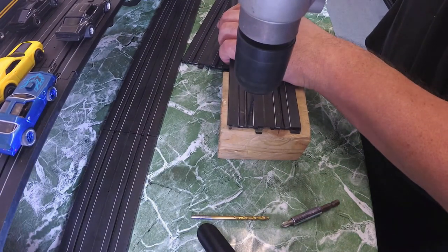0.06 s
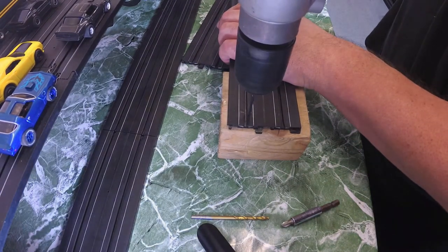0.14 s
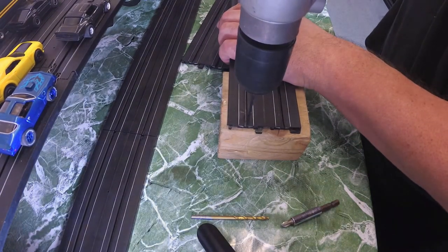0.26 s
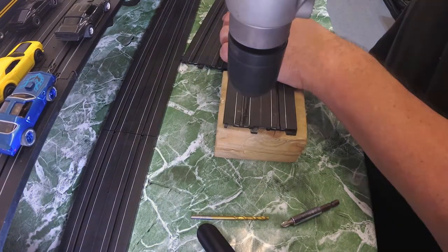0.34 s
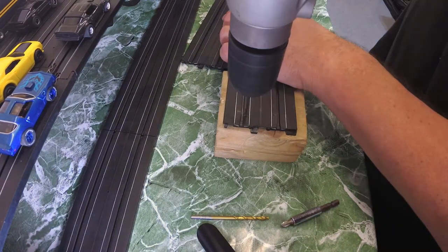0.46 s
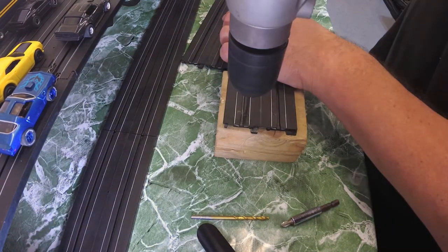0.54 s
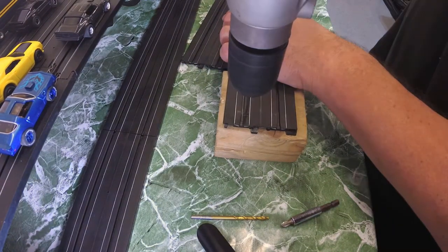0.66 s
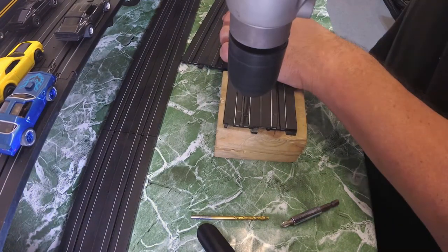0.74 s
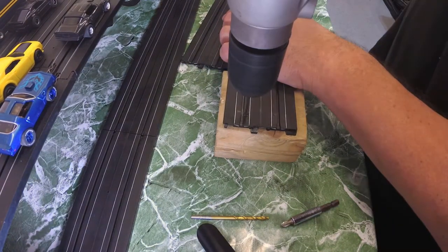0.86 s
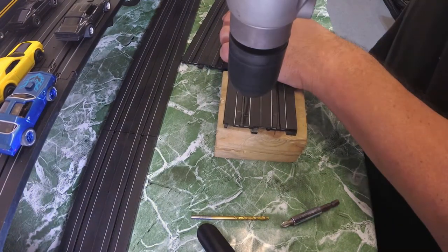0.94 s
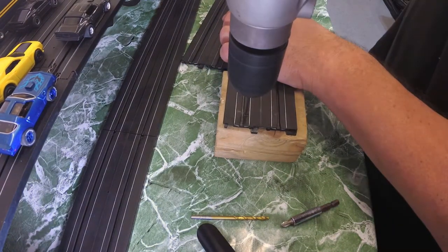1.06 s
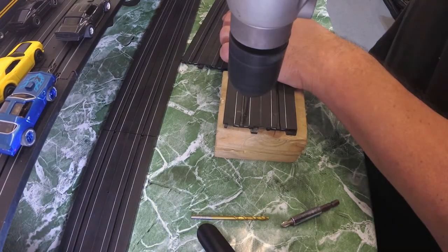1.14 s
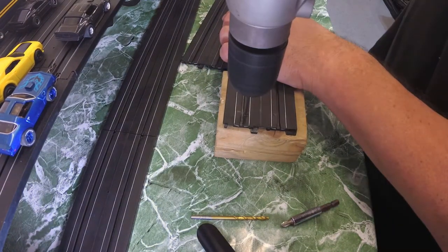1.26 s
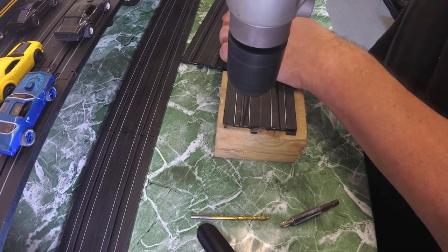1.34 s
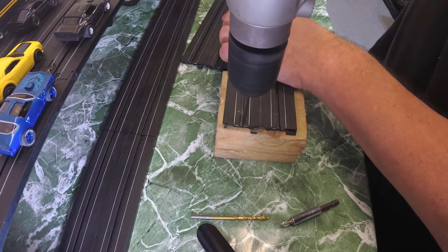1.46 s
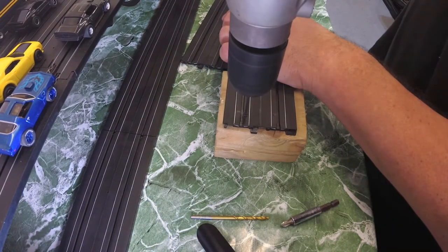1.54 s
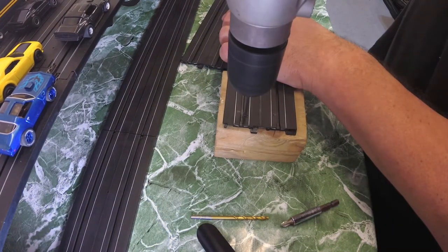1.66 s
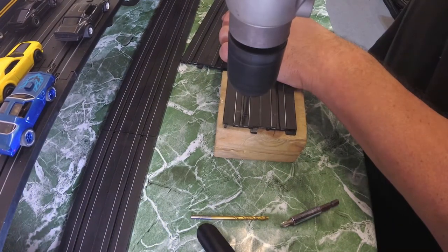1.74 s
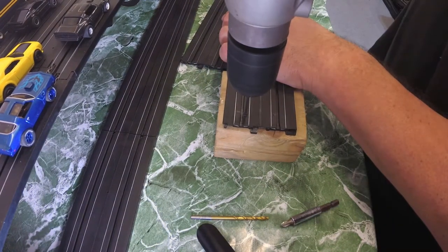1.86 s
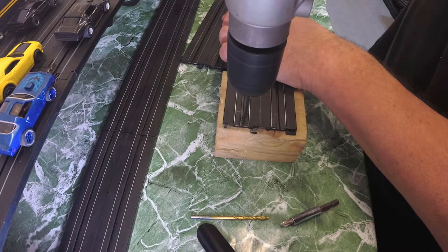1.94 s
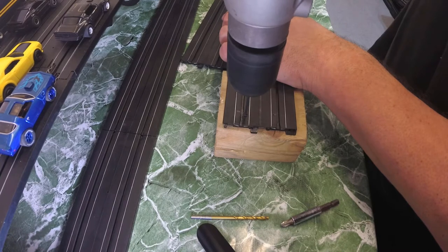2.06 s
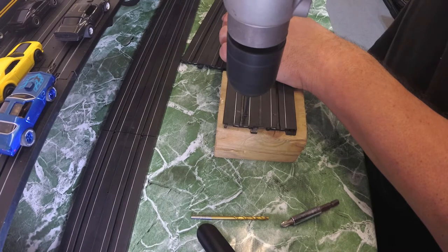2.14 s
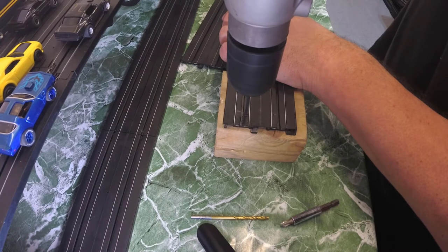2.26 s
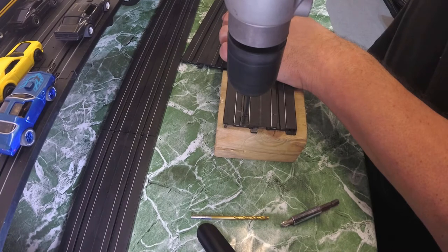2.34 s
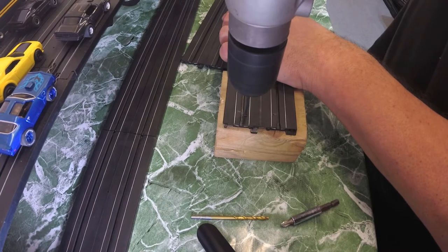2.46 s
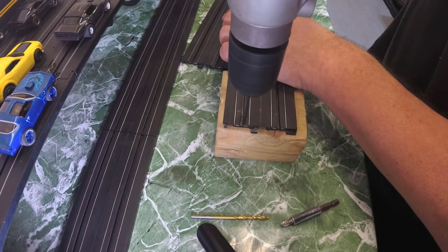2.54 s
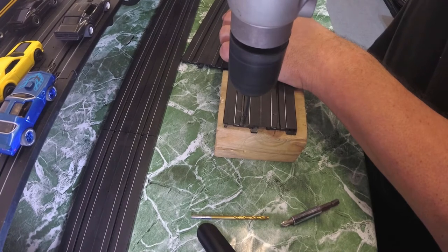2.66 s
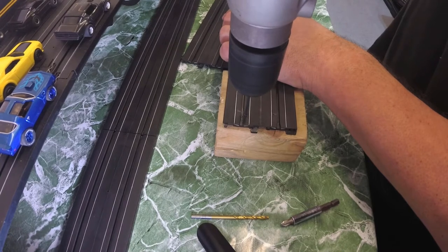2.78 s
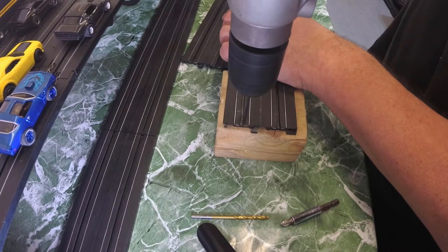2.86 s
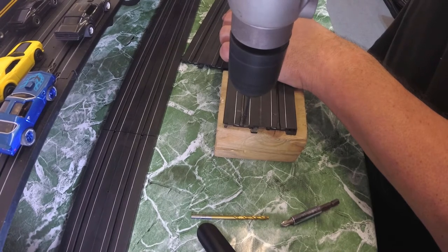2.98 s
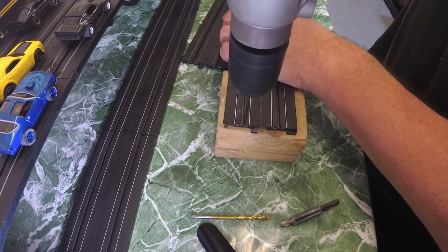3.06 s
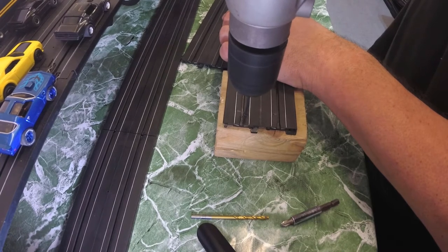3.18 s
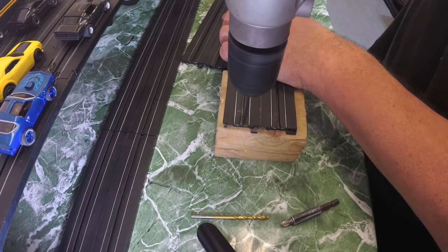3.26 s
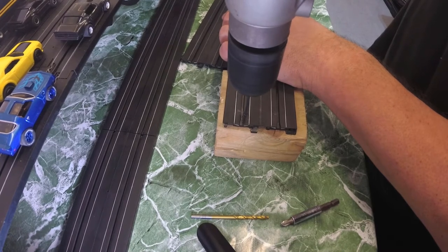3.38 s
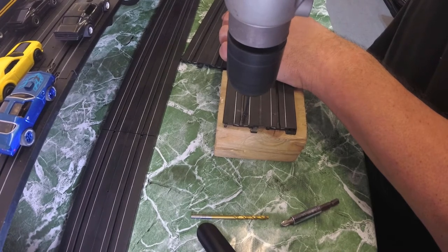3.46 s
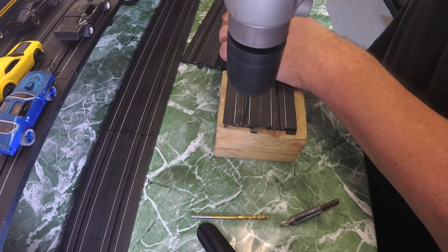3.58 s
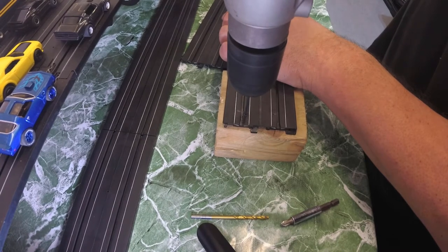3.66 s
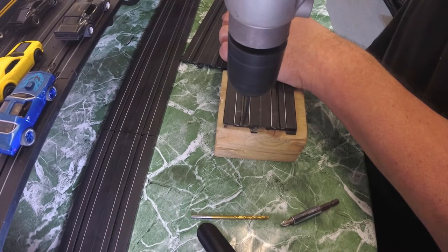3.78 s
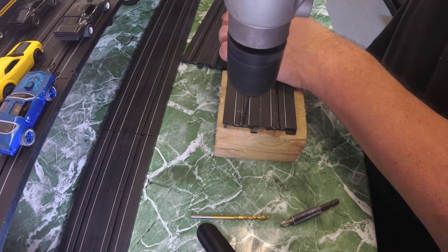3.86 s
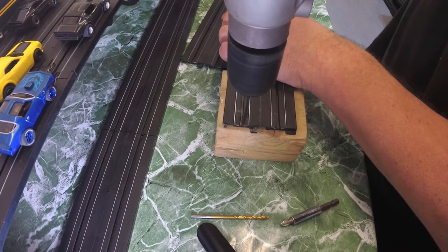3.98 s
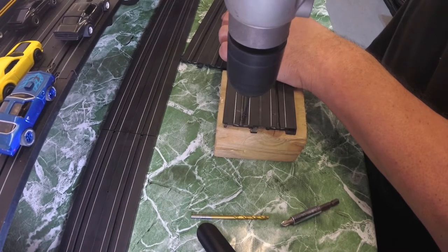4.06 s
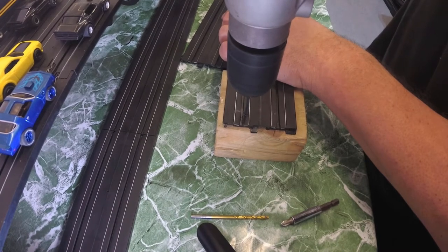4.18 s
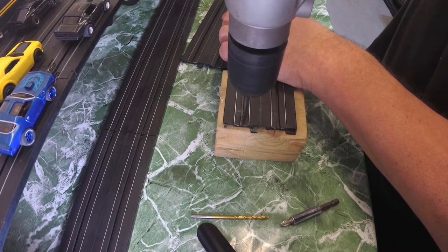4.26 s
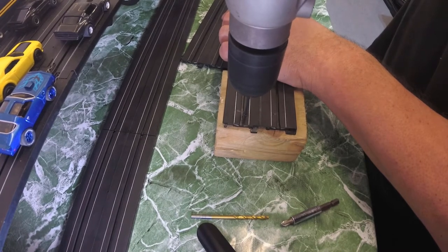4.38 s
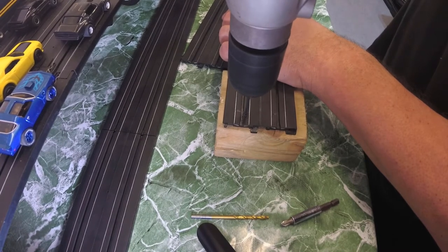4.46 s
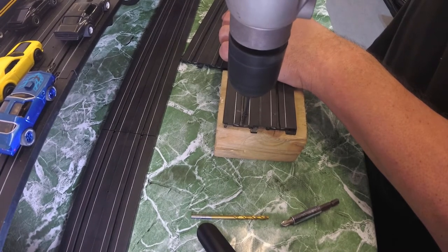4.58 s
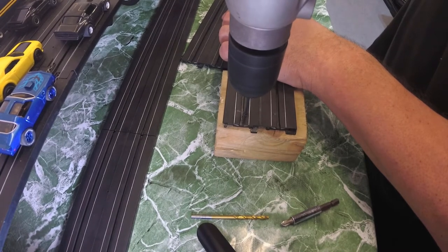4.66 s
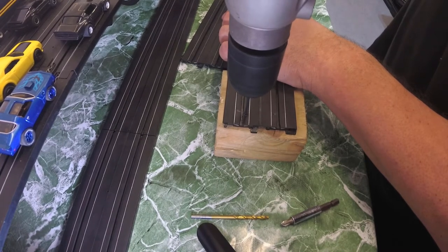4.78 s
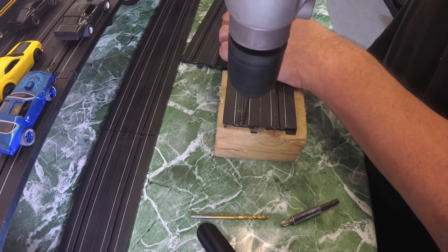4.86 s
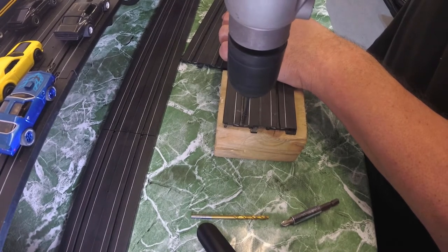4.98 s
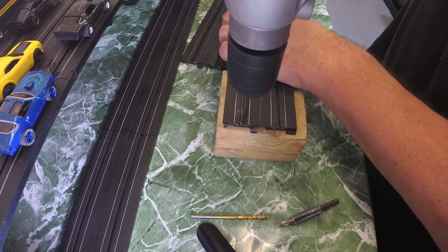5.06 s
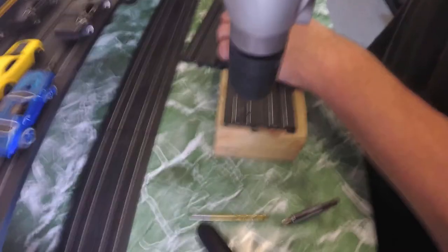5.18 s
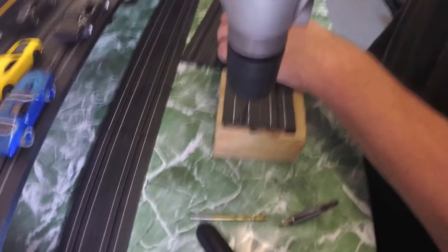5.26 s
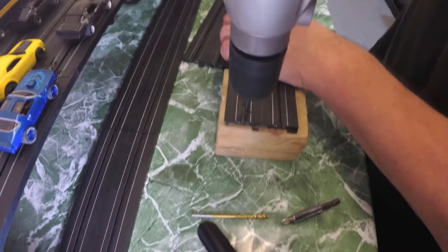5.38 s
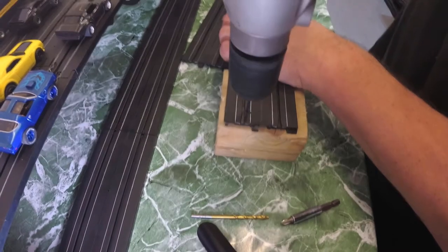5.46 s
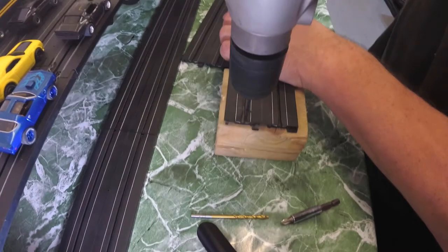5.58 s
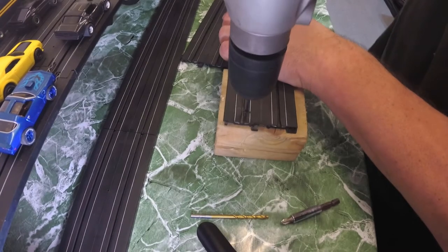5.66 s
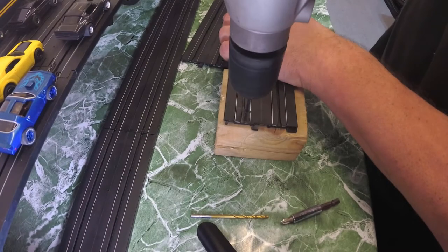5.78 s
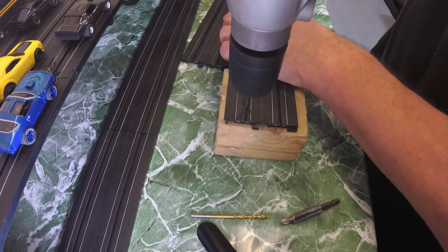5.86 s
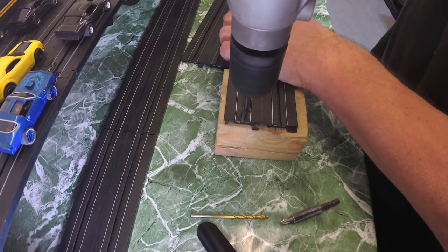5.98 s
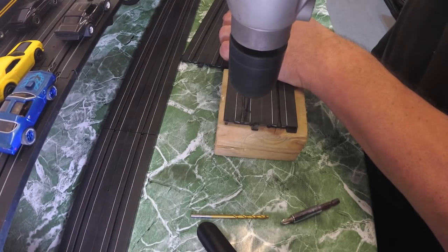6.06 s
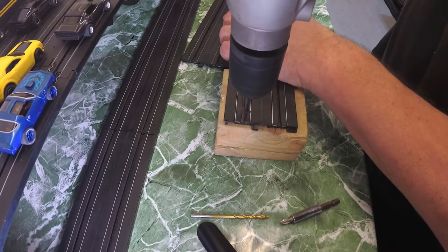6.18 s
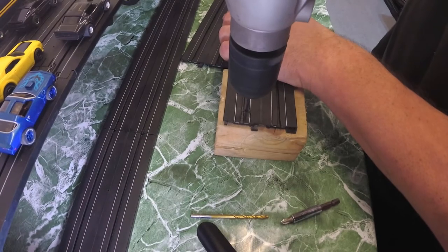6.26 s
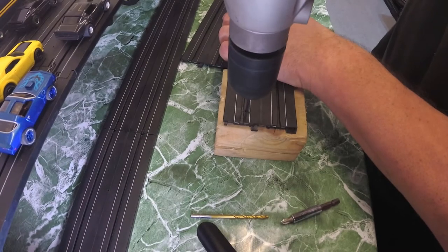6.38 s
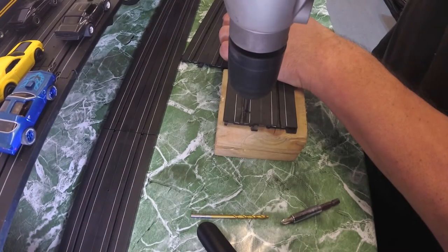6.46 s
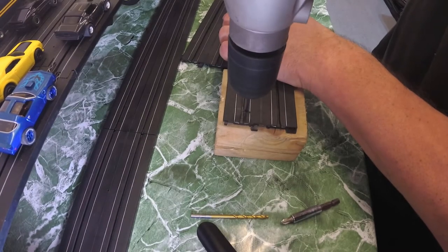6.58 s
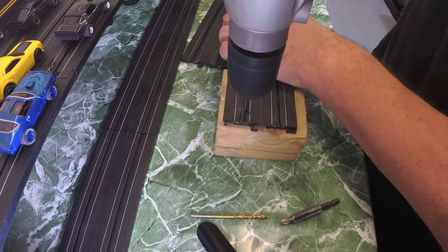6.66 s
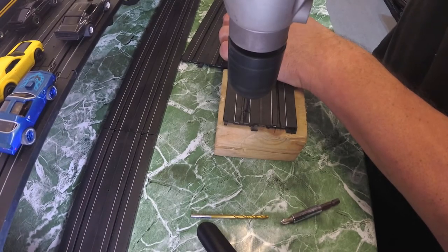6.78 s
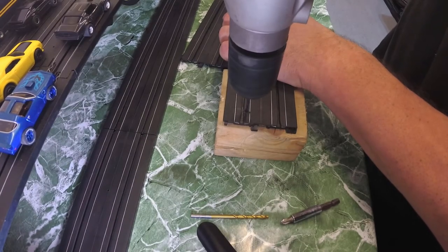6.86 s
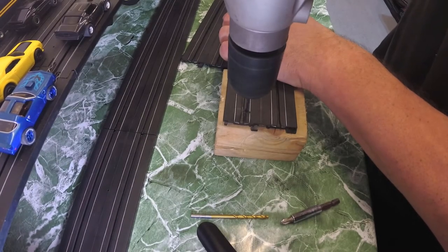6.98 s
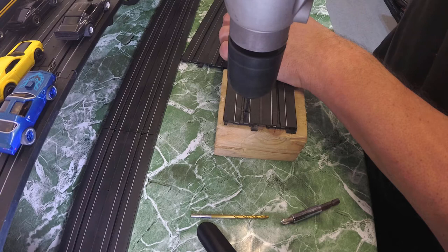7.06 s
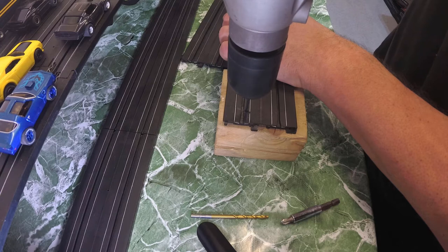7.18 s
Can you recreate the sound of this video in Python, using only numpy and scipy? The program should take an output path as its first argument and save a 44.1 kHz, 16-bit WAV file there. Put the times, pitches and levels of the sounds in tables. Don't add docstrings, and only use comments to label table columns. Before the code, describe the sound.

Close up indoors, a buzzing hand drill runs up to full speed, bores steadily, thumps the wood block beneath, and coasts down with gear clicks.

```python
import sys
import numpy as np
from scipy import signal
from scipy.fft import rfft, irfft
from scipy.io import wavfile

SR = 44100
rng = np.random.default_rng(int(sys.argv[2]) if len(sys.argv) > 2 else 0)


def to_wav(s):
    ch = np.atleast_2d(s).T
    pcm = np.round(np.clip(ch, -1, 1) * 32767)
    wavfile.write(sys.argv[1], SR, pcm.astype(np.int16))


def ratio(d):
    e = np.asarray(d, float) / 20
    return 10 ** e


N = 318843
T = np.arange(N) / SR

CHANGE_S, IDLE_HZ, CREEP_HZ_PER_S = .3525, 95, 57
TOP_HZ, SHORT_HZ, SPIN_UP_S, SPIN_UP_SHAPE = 229.95, 101.6, .528, .93
BITE_S, SAG_HZ_PER_S2 = 3.28, .67
RELEASE_S, RELEASE_HZ, FRICTION_HZ, COAST_S = 5.443, 226.8, 269, 4.0

FULL_CURRENT_S, CAUGHT_UP_S, CUT_OFF_S = (.5, .64), (1.6, 2.7), (5.42, 5.6)
FAN_BLADES, SLOTS, MESH_PER_TURN = 30, 12, 6
MAINS_HZ, MAINS_START = 60.011, .245

RATTLE_EDGES_HZ = [300, 750, 1700, 4600, 11500]
# full-speed level in dB, slope in dB per decade of speed, resting dB, idle dB.
RATTLE_BANDS = [
    (-49, 24, -64, -60),
    (-38, 41, -58, -58.5),
    (-25, 48, -62, -49.5),
    (-31, 47, -53, -52),
    (-39.5, 48.5, -61, -61),
    (-56, 57, -78, -78),
]
# frequency in Hz, level in dB per Hz.
RATTLE_COLOUR = [(30, -56), (100, -35.5), (150, -38.5), (185, -20), (330, -14.5), (640, -9.5), (780, -14),
                 (1700, -17), (3100, -15), (4500, -21.5), (6500, -31), (10000, -37.5), (12500, -43.5),
                 (15600, -48)]
# frequency in Hz, width in Hz, level in dB over the colour.
HOUSING_MODES = [(237, 13, -0.5), (638, 30, -1.5), (981.5, 172, 13), (1079, 175, 14.5), (1344, 270, 9.5),
                 (2160, 440, 4), (2770, 74, 4.5), (3496, 320, 3.5), (3827, 250, 9.5), (5174, 640, 3.5),
                 (6130, 210, 1), (7380, 110, 1.5), (8320, 100, 5.5), (10070, 250, 2), (10780, 400, 3.5),
                 (12950, 350, 9), (13350, 350, 6), (13850, 200, 1)]
SURGES_S = [0.064, 0.273]
SURGE_BANDS_DB = (.1, .1, 4, 8, 5, 3)
JOLT_BANDS_DB = (10, 10, 0, 3, 3, 2)
UNPOWERED_BANDS_DB = (-6.5, 0.3, -0.55, -0.4, -0.6, -4)
GRIND_BANDS_DB = (1, 1, 2.4, 2.8, 2.4, 0)
# centre in seconds, length in seconds, level in dB.
RATTLE_SWELLS = [
    (5.482, 0.14, 1),
    (6.638, 0.15, 2),
]
# multiple of shaft speed, level in dB before the housing.
SHAFT_ORDERS = [(2, -47.5), (3, -50.5), (4, -50), (8, -54.5), (9, -75), (12, -60.5), (24, -60), (36, -77),
                (48, -70)]
# frequency in Hz, width in Hz, level in dB.
DUCT_MODES = [(5120, 190, -46.5), (5450, 300, -52.5), (5930, 260, -52.5), (6180, 140, -54),
              (6340, 150, -47), (6590, 110, -51), (6795, 88, -51), (6885, 40, -48)]
# frequency in Hz, level in dB.
MESH_RESPONSE = [(600, -72), (760, -52), (900, -44), (1030, -35), (1100, -37), (1200, -46), (1380, -46)]
# multiple of shaft speed, level in dB.
COMMUTATOR_ORDERS = [(60, -69), (66, -80), (72, -65), (84, -72), (96, -66), (108, -68), (120, -76)]
# frequency in Hz, width in Hz, level in dB.
BRUSH_MODES = [(13000, 500, -1), (13780, 150, -6), (14400, 320, -3), (15050, 350, -5), (15600, 450, 0)]
# frequency in Hz, width in Hz, level in dB.
SHELL_MODES = [(2210, 195, 0.5), (2618, 245, 4)]
# frequency in Hz, width in Hz, level in dB.
CAP_MODE = (3580, 170, 0)
# shaft speed in Hz, level in dB.
CHATTER_RESPONSE = [(45, -49), (80, -46), (92, -44), (140, -42), (170, -41), (200, -43.5)]
# frequency in Hz, level in dB, t60 in seconds.
GEAR_MODES = [(1030, -3, .01), (1433, 7.5, 0.016), (1780, 2, 0.0065), (2210, 8, 0.011), (2560, 4, 0.0087),
              (2946, -1.5, 0.017), (3860, -7, 0.0073), (5900, -17, .004), (9400, -25, .003)]
# start in seconds, peak level in dB.
GEAR_TICKS = [(.3535, -22), (.522, -19), (.569, -24), (6.535, -27), (6.575, -26), (6.698, -25), (6.73, -29),
              (6.755, -28), (6.824, -31), (6.911, -22), (6.987, -33), (7.05, -35), (7.084, -38),
              (7.156, -24.5)]
# start in seconds, peak level in dB.
BLOCK_KNOCKS = [
    (5.2048, -5.5),
    (5.2165, -15),
    (5.229, -19),
]
# frequency in Hz, level in dB, t60 in seconds.
BLOCK_MODES = [(330, -5, .06), (500, -4, .06), (640, 6, .055), (900, -3, .04), (1150, -5, .03),
               (1400, -5, .025), (1750, -5, .03), (2100, -7, .025), (3000, -15, .01)]
# start in seconds, peak level in dB.
TABLE_THUDS = [
    (5.186, -21.5),
    (5.196, -28),
]
# frequency in Hz, level in dB, t60 in seconds.
TABLE_MODES = [(45, -19, 0.13), (65.4, -15.5, 0.18), (184, -2, 0.12), (320, 3, 0.024), (465, -5, .03)]
# centre in seconds, length in seconds, level in dB.
TABLE_SHOVES = [(1.1, 1.1, -60), (1.9, 0.23, -62), (2.27, .17, -64), (3.298, 1.94, -60), (4.352, 0.23, -73),
                (5.205, 0.072, -44), (5.38, .3, -58), (5.797, 0.37, -63), (6.33, 0.16, -61.5)]
# centre in seconds, length in seconds, pitch in Hz, level in dB.
BLOCK_CREAKS = [(0.114, 0.18, 238, -52.5), (0.46, 0.26, 217, -46.5), (6.432, 0.33, 355, -51),
                (6.7, 0.19, 369, -49.5), (6.863, 0.17, 400, -47), (7.17, 0.12, 440, -47)]


def evened(x):
    return x / np.sqrt(np.mean(x ** 2) + 1e-20)


def wander(hz):
    lowpass = 1 / (1 + (np.fft.rfftfreq(N, 1 / SR) / hz) ** 2)
    return evened(irfft(rfft(rng.standard_normal(N)) * lowpass, N))


def ramp(start, end):
    return np.clip((T - start) / (end - start), 0, 1)


def read(points, hz):
    return np.interp(hz, *np.transpose(points))


def resonate(x, hz, width):
    return signal.lfilter(*signal.iirpeak(hz, hz / width, SR), x)


def twice_resonate(x, hz, width, second_hz, second_width):
    return resonate(resonate(x, hz, width), second_hz, second_width)


def heard_through(modes, hz):
    coarse = hz[::64]
    gain = sum(ratio(db) / (1 + (2 * (coarse - f) / width) ** 4) for f, width, db in modes)
    return gain.repeat(64)[:N]


def shortfall():
    since = np.maximum(T - CHANGE_S, 0)
    return np.exp(-(since / SPIN_UP_S) ** SPIN_UP_SHAPE) * (T > CHANGE_S)


def shaft():
    idling = IDLE_HZ + CREEP_HZ_PER_S * T
    driven = TOP_HZ - SHORT_HZ * shortfall() - SAG_HZ_PER_S2 * np.maximum(T - BITE_S, 0) ** 2
    coasting = (RELEASE_HZ + FRICTION_HZ) * np.exp((RELEASE_S - T) / COAST_S) - FRICTION_HZ
    return np.where(T < CHANGE_S, idling, np.minimum(driven, coasting))


def housing(hz):
    humps = sum(ratio(db) ** 2 / (1 + (2 * (hz - f) / w) ** 2) ** 2 for f, w, db in HOUSING_MODES)
    return np.sqrt(1 + humps)


def rattle(speed, turns):
    uneven_db = 0.64 * wander(hz=400) + 0.59 * wander(hz=26) + 0.89 * np.cos(2 * np.pi * turns)
    scrapes = rng.standard_normal(N) * ratio(uneven_db)
    grains = (1 - speed / TOP_HZ) * wander(hz=120)
    hz = np.fft.rfftfreq(N, 1 / SR)
    colour_hz, colour_db = np.transpose(RATTLE_COLOUR)
    colour = ratio(np.interp(np.log(hz + 1), np.log(colour_hz), colour_db))
    spectrum = rfft(scrapes) * colour * housing(hz)
    below = [0] + [1 / (1 + (hz / edge) ** 8) for edge in RATTLE_EDGES_HZ] + [1]

    swell_db = sum(db * np.exp(-((T - s) / length) ** 4) for s, length, db in RATTLE_SWELLS)
    surge = sum(np.exp(-((T - s) / 0.011) ** 2) for s in SURGES_S)
    jolt = np.exp(-((T - 5.205) / .018) ** 2)
    unpowered = ramp(*CUT_OFF_S)
    out = 0
    for band, (full_db, slope_db, rest_db, idle_db) in enumerate(RATTLE_BANDS):
        running_db = full_db + slope_db * np.log10(speed / TOP_HZ) + swell_db
        running_db = running_db + JOLT_BANDS_DB[band] * jolt + UNPOWERED_BANDS_DB[band] * unpowered
        running = np.hypot(ratio(running_db), ratio(rest_db))
        idling = ratio(idle_db + SURGE_BANDS_DB[band] * surge)
        level = np.where(T < CHANGE_S, idling, running) * ratio(GRIND_BANDS_DB[band] * grains)
        out = out + level * evened(irfft(spectrum * (below[band + 1] - below[band]), N))
    return out


def shaft_whine(speed, turns):
    coarse = speed[::64]
    force_db = 40 * np.log10(speed / speed.max())
    out = np.zeros(N)
    for k, db in SHAFT_ORDERS:
        hz = k * coarse
        radiated = housing(hz) ** 1.58 / (1 + (175 / hz) ** 12)
        level = ratio(db + force_db + 3.1 * wander(hz=6.1)) * radiated.repeat(64)[:N]
        out += level * np.sin(2 * np.pi * (k * turns + rng.random()))
    return out


def unbalance_and_mesh(speed, turns):
    slow_db = -10 * np.log10(1 + (170 / speed) ** 28)
    settle_db = -90 * np.maximum(T - RELEASE_S, 0)
    unbalance_db = -48.5 + 6 * shortfall() + slow_db + settle_db
    loaded_db = 6.5 * ramp(BITE_S - .3, BITE_S) * (T < RELEASE_S)
    mesh_db = read(MESH_RESPONSE, MESH_PER_TURN * speed) + loaded_db
    out = np.zeros(N)
    for k, db in ((1, unbalance_db), (MESH_PER_TURN, mesh_db)):
        level = ratio(db + 1.5 + 0.86 * wander(hz=13)) * (T > CHANGE_S)
        out += level * np.sin(2 * np.pi * k * turns)
    return out


def fan(speed, turns):
    level = ratio(3 + .7 * wander(hz=6)) * heard_through(DUCT_MODES, FAN_BLADES * speed)
    return level * np.sin(2 * np.pi * FAN_BLADES * turns)


def commutator(speed, turns):
    waver = ratio(3.0 * wander(hz=4)) * (T > CHANGE_S)
    out = np.zeros(N)
    for k, db in COMMUTATOR_ORDERS:
        out += ratio(db) * waver * heard_through(BRUSH_MODES, k * speed) * np.sin(2 * np.pi * k * turns)
    return out


def powered_level(idle_db, soft_db, full_db):
    pressed_db = soft_db + (full_db - soft_db) * ramp(*FULL_CURRENT_S)
    return ratio(np.where(T < CHANGE_S, idle_db, pressed_db))


def buzz(turns):
    current = np.exp(18.6 * (np.cos(2 * np.pi * (MAINS_HZ * T - MAINS_START + 0.1)) - 1))
    pull = evened(current - .75 * ramp(*CAUGHT_UP_S) * current.mean())
    slots = powered_level(-83, -32, -31) * np.sin(2 * np.pi * SLOTS * turns)
    slots += powered_level(-54, -40, -53) * np.sin(4 * np.pi * SLOTS * turns)
    drive = ratio(5.5 + .5 * wander(hz=49) - 60 * ramp(*CUT_OFF_S)) * pull * slots
    out = np.zeros(N)
    for k, (hz, width, db) in enumerate(SHELL_MODES + [CAP_MODE]):
        out += (-1) ** k * ratio(db) * twice_resonate(drive, hz, width, hz, 2 * width)
    return out


def chatter(speed):
    knocked = rng.random(N) < 2000 / SR
    size = ratio(2.5 * np.minimum(rng.exponential(1, N), 4)) * knocked
    which, t = rng.integers(0, len(GEAR_MODES), N), T[:1000]
    out = np.zeros(N)
    for k, (hz, db, t60) in enumerate(GEAR_MODES):
        ring = ratio(db - 30 * t / t60) * np.sin(2 * np.pi * hz * t)
        out += signal.oaconvolve(size * (which == k), ring)[:N]
    level = ratio(read(CHATTER_RESPONSE, speed) + 5.5 * shortfall())
    return level * evened(np.diff(out, prepend=0))


def hits(events, modes, rise_s):
    out, t = np.zeros(N + SR), T[:SR // 4]
    rise = 1 - np.exp(-(t / rise_s) ** 2)
    for s, peak_db in events:
        ring = np.zeros(len(t))
        for hz, db, t60 in modes:
            strength, phase = rng.random(2)
            ring += ratio(db + 6 * strength - 60 * t / t60) * np.sin(2 * np.pi * (hz * t + phase))
        ring *= rise
        out[round(s * SR):][:len(t)] += ratio(peak_db) * ring / abs(ring).max()
    return out[:N]


def room(x, t60, wet_db):
    t = T[:SR // 3]
    tail = rng.standard_normal(len(t)) * ratio(-60 * t / t60) * (t > .004)
    return x + ratio(wet_db) * signal.fftconvolve(x, tail / np.linalg.norm(tail))[:N]


def background():
    thrum, hum, creak = rng.standard_normal((3, N))
    shoved = ratio(-79)
    for s, length, db in TABLE_SHOVES:
        shoved = shoved + ratio(db) * np.exp(-((T - s) / length * 2) ** 4)
    out = shoved * evened(twice_resonate(thrum, 65, 78, 135, 140))
    out += ratio(-58.5) * evened(twice_resonate(hum, 217, 125, 340, 250))
    for s, length, hz, db in BLOCK_CREAKS:
        swell = np.exp(-((T - s) / length * 2) ** 2)
        out += ratio(db) * evened(twice_resonate(creak, hz, 90, hz, 90)) * swell
    return out


def patchy_stereo(mid):
    hz, t, z = signal.stft(mid, SR, nperseg=2048)
    patches = rng.random((len(hz) // 32 + 1, len(t))) < .09
    patches = patches.repeat(32, axis=0)[:len(hz)]
    scattered = z * np.exp(2j * np.pi * rng.random(z.shape)) * patches * (hz[:, None] > 2900)
    side = ratio(-11) * signal.istft(scattered, SR, nperseg=2048)[1][:N]
    return np.array([mid + side, mid - side])


def scene():
    speed = shaft()
    turns = np.cumsum(speed) / SR
    mid = rattle(speed, turns) + shaft_whine(speed, turns) + unbalance_and_mesh(speed, turns)
    mid += fan(speed, turns) + commutator(speed, turns) + chatter(speed)
    mid += room(buzz(turns), t60=.1, wet_db=-16)
    blows = hits(BLOCK_KNOCKS, BLOCK_MODES, rise_s=.0006) + hits(TABLE_THUDS, TABLE_MODES, rise_s=.003)
    blows += hits(GEAR_TICKS, GEAR_MODES, rise_s=.0003)
    mid += room(blows, t60=.15, wet_db=-17) + background()
    return patchy_stereo(mid)


def band_limit(x):
    return signal.sosfilt(signal.butter(12, 15710, fs=SR, output="sos"), x)


def record(dry):
    return band_limit(dry)


dry = scene()
out = record(dry)
to_wav(out)
```